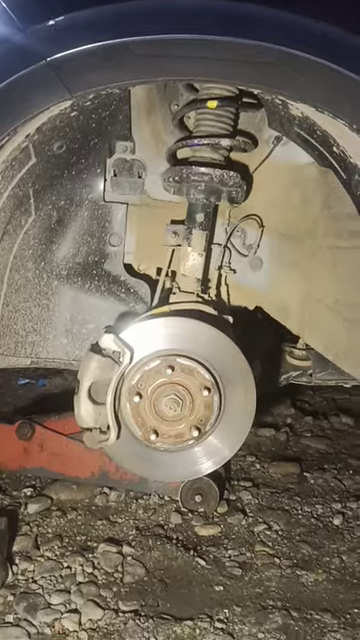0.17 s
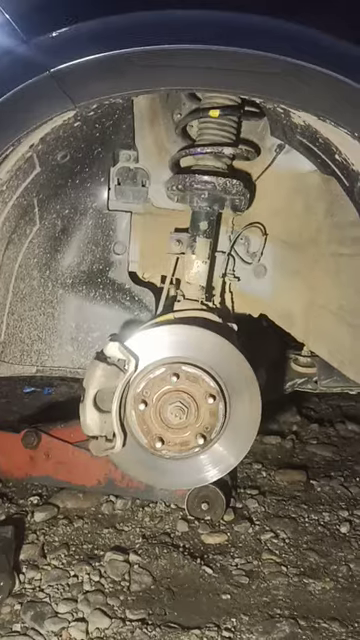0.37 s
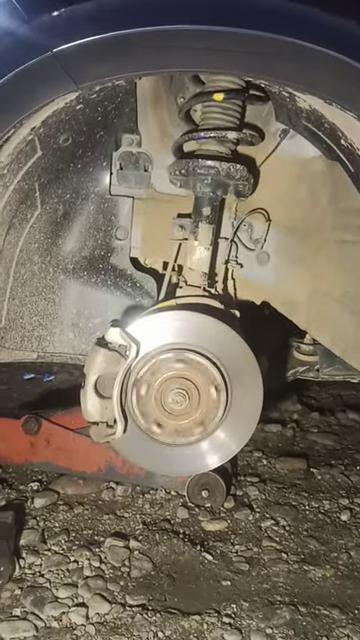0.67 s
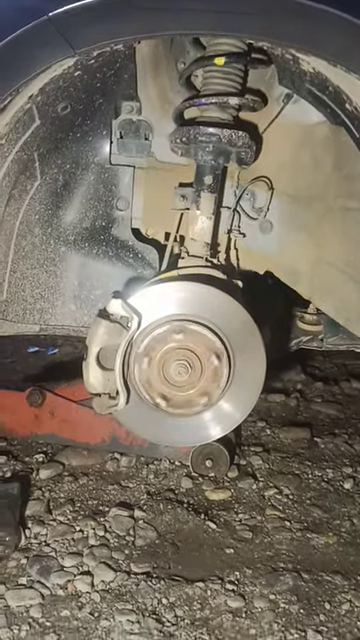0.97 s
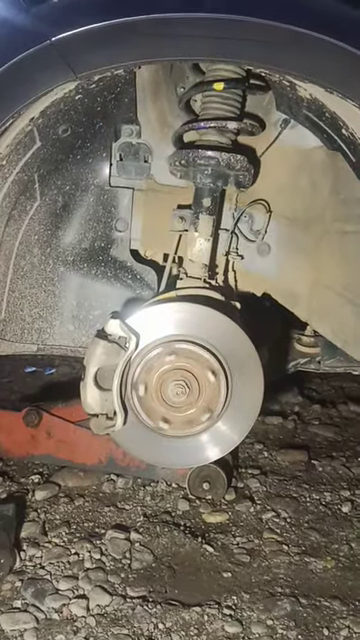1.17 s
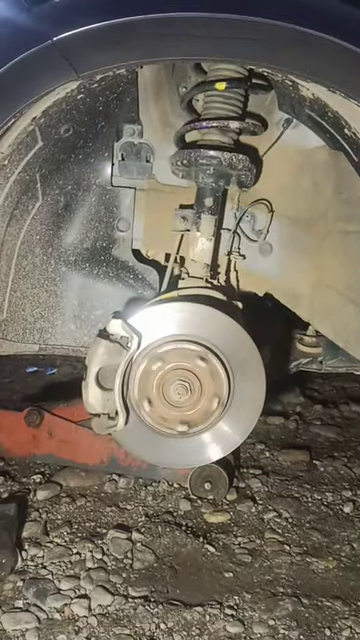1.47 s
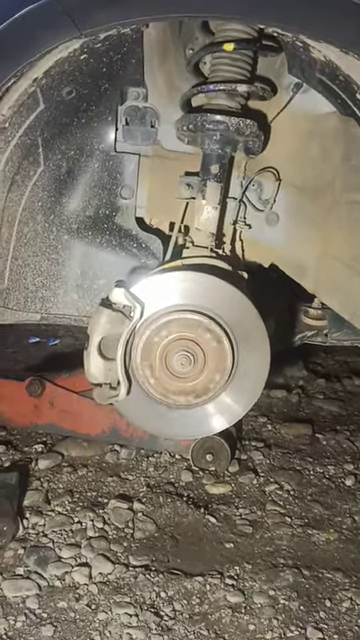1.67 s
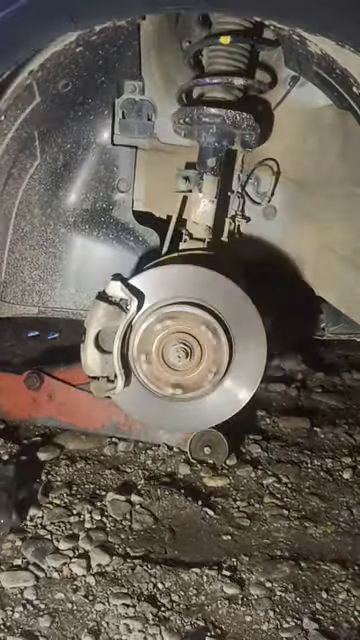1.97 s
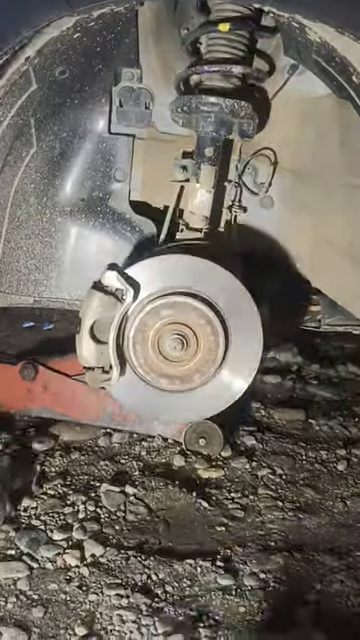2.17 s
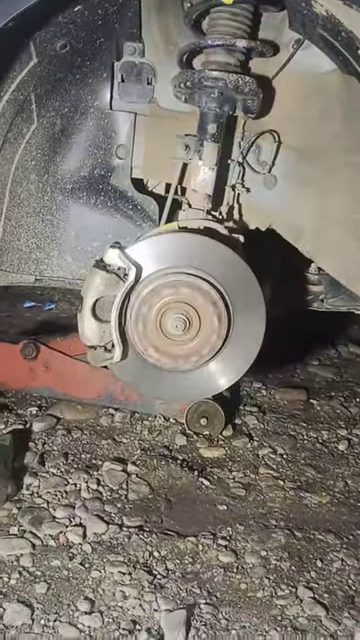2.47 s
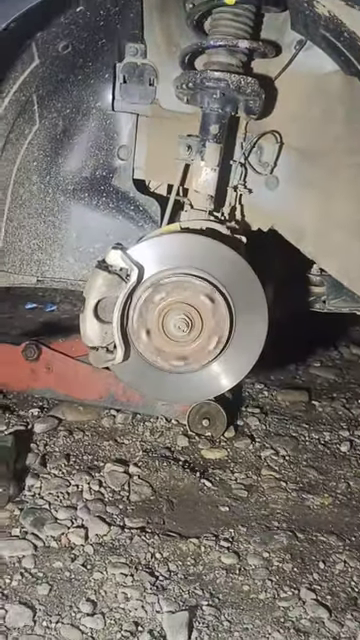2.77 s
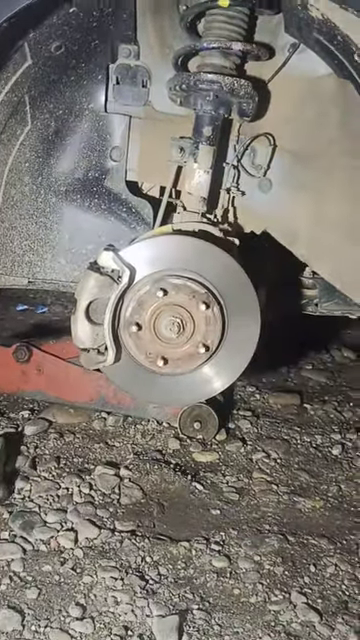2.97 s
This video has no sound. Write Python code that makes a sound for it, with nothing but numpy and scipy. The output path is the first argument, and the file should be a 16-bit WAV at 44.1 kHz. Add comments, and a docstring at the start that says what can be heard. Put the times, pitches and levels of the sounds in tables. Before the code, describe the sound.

One brief brake squeak from a turning disc, with two metal knocks over engine and wind rumble.

```python
"""A bare brake disc turns on a jacked-up car at night, one microphone close to the wheel arch.
The pad drags on the disc and sets its modes ringing in one short squeal. Loose metal knocks twice,
chattering and ringing until it seats, and a few dull thumps and gritty scuffs come between.
Behind it all lie a rough, fluttering rush and the low rumble of engine and wind."""
import sys
import numpy as np
from scipy import signal
from scipy.fft import rfft, irfft, next_fast_len
from scipy.io import wavfile

SR = 44100
rng = np.random.default_rng(int(sys.argv[2]) if len(sys.argv) > 2 else 0)


def wav_out(sig):
    """Save sig, one row per channel (or a flat mono array), as 16-bit PCM at SR to the path in sys.argv[1]."""
    wavfile.write(sys.argv[1], SR, np.round(np.clip(np.atleast_2d(sig).T, -1, 1) * 32767).astype(np.int16))


N = 137151

# Disc modes taking turns to sound, close up: start_s, length_s, pitch_hz, level_db, fuzz_ratio
BRAKE_SQUEAKS = [(.097, .028, 5110, -44, .6), (1.4, .024, 2116, -43, .3), (1.426, .056, 2118, -37.5, .25),
                 (1.435, .05, 842, -35, .45), (1.385, .06, 3063, -56, .3), (1.434, .025, 3063, -46, .1),
                 (1.453, .028, 3066, -30, .05), (1.486, .042, 3074, -33, .05), (1.4, .14, 4624, -57, .5),
                 (1.438, .028, 4624, -43, .2), (1.467, .029, 4626, -36, .2), (1.489, .026, 4620, -45, .35),
                 (1.385, .16, 5566, -63, .5), (1.447, .024, 5566, -52, .2), (1.473, .037, 5566, -43.5, .35),
                 (1.484, .024, 2760, -45, .8), (1.432, .07, 8091, -66, .2), (1.483, .023, 8662, -59, .3),
                 (1.458, .035, 11330, -67, .2), (1.433, .048, 12608, -67, .6),
                 (1.433, .035, 13300, -67, .6), (1.433, .03, 14150, -69, .8), (1.506, .02, 12680, -57, .5),
                 (1.504, .022, 11050, -61, .5), (1.505, .022, 9400, -61, .6), (1.56, .17, 14570, -77, .7),
                 (1.57, .14, 11470, -81, .6), (2.838, .06, 3380, -57, .95)]


def brake_squeal(length_s, pitch_hz, level_db, fuzz):
    """One disc mode swells, wavers, lets go and rings out; uneven friction blurs its pitch."""
    edge_s, ring_s = .013, .006
    waver_hz, blur_hz, boost_db = 20, 130, 1
    t = np.arange(0, length_s + 6 * ring_s, 1 / SR)
    rise = np.sin(np.pi / 2 * np.minimum(t / edge_s, 1)) ** 2
    fall = 1 / np.cosh(np.maximum(t - length_s + edge_s, 0) / ring_s)
    pitch = pitch_hz + waver_hz * drift(rate_hz=320, size=len(t))
    blur = (drift(blur_hz, len(t)) + 1j * drift(blur_hz, len(t))) / np.sqrt(2)
    pure = np.exp(2j * np.pi * np.cumsum(pitch) / SR)
    tone = (np.sqrt(1 - fuzz ** 2) + fuzz * blur) * pure
    return amp(level_db + boost_db) * np.sqrt(2) * rise * fall * tone.real


# The pad rubbing before, under and after the squeal: time_s, level_db
DRAG_LEVEL = [(1.12, -70), (1.18, -43), (1.35, -45), (1.47, -39), (1.57, -45), (1.9, -48), (2.05, -56),
              (2.2, -90)]


def pad_drag(pitch_hz=1287, width_hz=284):
    """Pad friction excites one broad resonance of the brake."""
    resonance = np.exp(2j * np.pi * pitch_hz * np.arange(N) / SR)
    friction = drift(width_hz / 2) + 1j * drift(width_hz / 2)
    return unit((resonance * friction).real) * level(DRAG_LEVEL)


# Ring of the lower-pitched loose part: pitch_hz, level_db, t60_s
CLANK_MODES = [(495, 2.5, .06), (940, 2, .06), (2060, -2, .07), (2240, -8, .07), (2560, -10, .07),
               (3450, -10, .07), (4380, -21, .07), (5260, -14, .07), (7090, -31, .15), (8550, -24, .12),
               (9720, -15, .08), (10900, -17, .13), (13780, -20, .09), (14640, -21, .12)]
# Crunch of its contact: frequency_hz, density_db
CLANK_CRUNCH = [(200, -10), (500, -4), (1300, 0.5), (2400, -5), (4000, -13.5), (5500, -18.5), (6300, -35),
                (7800, -39), (9200, -21), (12200, -30), (14000, -29), (15500, -36)]


def clank():
    """A loose part knocks with a short, low ring."""
    return metal_knock(CLANK_MODES, CLANK_CRUNCH, chatter_s=.033, seated_s=.052,
                       ring_db=-34, crunch_db=-30, tail_db=-9.5, tail_t60_s=.12)


# Ring of the brighter loose part: pitch_hz, level_db, t60_s
CLINK_MODES = [(2230, -1, .06), (3490, 1, .06), (4605, 2, .18), (5420, -8, .08), (6968, -12, .12),
               (9282, -11, .2), (9950, -7, .05), (10340, -8, .07), (11570, -5, .06), (12400, -8, .05),
               (12585, -4, .08), (12890, -11, .2), (13770, -9, .07), (14955, -11, .09)]
# Crunch of its contact: frequency_hz, density_db
CLINK_CRUNCH = [(500, -12), (2000, 2), (3500, -4), (5400, -9), (6500, -21), (10000, -12), (13000, -8),
                (15500, -12)]


def clink():
    """A second loose part knocks with a thin, high ring."""
    return metal_knock(CLINK_MODES, CLINK_CRUNCH, chatter_s=.024, seated_s=.039,
                       ring_db=-38.5, crunch_db=-36, tail_db=-6, tail_t60_s=.13)


def metal_knock(modes, crunch, chatter_s, seated_s, ring_db, crunch_db, tail_db, tail_t60_s):
    """Metal chatters on metal, rings with clear modes over a dense tail, and is damped as it seats."""
    chatter_hz, damping_s = 250, .005
    t = np.arange(SR // 8) / SR
    contact = np.sin(np.pi * np.minimum(t / chatter_s, 1))
    force = contact * amp(2 * drift(chatter_hz, len(t)))
    damping = np.exp(-np.maximum(t - seated_s, 0) / damping_s)

    def ring(t60_s):
        """Builds up under the chatter and dies away."""
        build = signal.fftconvolve(force ** 2, amp(-60 * t / t60_s))[:len(t)]
        return damping * build / build.max()

    tail = amp(crunch_db + tail_db) * ring(tail_t60_s)
    sound = (amp(crunch_db) * force + tail) * noise(crunch, len(t))
    for pitch_hz, level_db, t60_s in modes:
        phase = 2 * np.pi * (pitch_hz * t + rng.random())
        jitter = .6 * force * drift(rate_hz=150, size=len(t))
        sound += amp(ring_db + level_db) * ring(t60_s) * np.sin(phase + jitter)
    return sound


# Dull thumps at the car: start_s, length_s, pitch_hz, level_db
THUMPS = [(.508, .013, 110, -19), (1.112, .024, 115, -24), (2.045, .02, 100, -21), (2.072, .028, 85, -23),
          (2.772, .034, 180, -20), (2.913, .02, 110, -23)]


def thump(length_s, pitch_hz, level_db):
    """A few cycles of a dull low push, unsteady in pitch."""
    push = swell(length_s)
    pitch = pitch_hz * (1 + .19 * drift(rate_hz=140, size=len(push)))
    return amp(level_db) * np.sqrt(2) * push * np.sin(2 * np.pi * np.cumsum(pitch) / SR)


# Scuffs of grit near the microphone: start_s, length_s, level_db, hiss_db
SCUFFS = [(.075, .028, -32.5, -64), (.113, .044, -29.5, -57), (.136, .05, -37, -53.5),
          (.798, .022, -46, -64), (.83, .016, -50, -66), (1.43, .045, -48, -62), (1.49, .04, -44, -64),
          (1.94, .075, -58, -60), (2.926, .038, -35.5, -67), (2.978, .018, -48, -78)]
# The body of a scuff and its fine hiss: frequency_hz, density_db
SCUFF_SPECTRUM = [(200, -7), (550, 4.5), (1200, 1), (2200, -1), (3200, -10), (4800, -9), (5700, -22),
                  (6800, -33), (15000, -53)]
HISS_SPECTRUM = [(4000, -23), (7000, -1), (9000, 5), (11500, -1), (13800, 7), (15500, -21.5)]


def scuff(length_s, level_db, hiss_db):
    """A short gritty rub with fine hiss on top."""
    stroke = swell(length_s)
    body = amp(level_db) * noise(SCUFF_SPECTRUM, len(stroke))
    hiss = amp(hiss_db) * noise(HISS_SPECTRUM, len(stroke))
    return stroke * (body + hiss)


# The rush around the wheel arch and its treble: frequency_hz, density_db
RUSH_SPECTRUM = [(100, -7.5), (250, -3), (400, 1), (600, -3.5), (900, -5.5), (1350, -7.5), (1700, -15),
                 (2400, -19), (3300, -37), (6000, -75)]
TREBLE_SPECTRUM = [(700, -36), (1500, 5), (2200, -1), (2800, 0), (3300, -6), (4200, -4), (5300, -12.5),
                   (5800, -17.5), (6500, -27.5), (7600, -30), (9200, -23.5), (11500, -28), (14000, -24),
                   (15500, -26.5)]
# Their rise and fall: time_s, body_db, treble_db
RUSH_LEVEL = [(.08, -31, -43), (.14, -39.5, -47), (.2, -34.5, -45), (.45, -37, -49.5), (.7, -39, -53),
              (.82, -35, -52), (.98, -40.5, -52), (1.25, -40, -53.5), (1.48, -34.5, -44.5),
              (1.6, -34.5, -50), (1.69, -33.5, -45.5), (1.86, -36, -51.5), (1.99, -36, -47.5),
              (2.06, -30.5, -38.5), (2.15, -34.5, -44.5), (2.27, -32, -43), (2.39, -34, -47.5),
              (2.5, -31.5, -42), (2.7, -38, -50.5), (2.8, -35.5, -51), (2.9, -40.5, -52.5),
              (3.1, -41.5, -53)]


def rush(flutter_db=1.36, ticks_per_s=260, grit_db=-10):
    """A fluttering rush of noise; tiny ticks make its treble gritty."""
    flutter = amp(flutter_db * drift(rate_hz=57))
    ticks = (rng.random(N) < ticks_per_s / SR) * rng.choice([-1, 1], N)
    tick_gain = amp(-2.5 * np.minimum(rng.exponential(1, N), 4))
    treble = noise(TREBLE_SPECTRUM) + amp(grit_db) * colour(ticks * tick_gain, TREBLE_SPECTRUM)
    body = noise(RUSH_SPECTRUM) * level(RUSH_LEVEL)
    return flutter * (body + treble * level(RUSH_LEVEL, column=2))


# Engine and wind in the background: frequency_hz, density_db
RUMBLE_SPECTRUM = [(15, -13), (30, -18.5), (45, -9), (65, -3), (120, 0), (170, -0.5), (250, -9),
                   (330, -16.5), (600, -31), (1500, -76)]
# Their rise and fall at the microphone: time_s, level_db
RUMBLE_LEVEL = [(.09, -28), (.2, -26.5), (.5, -27), (.8, -30.5), (1.05, -32), (1.15, -31), (1.4, -29.5),
                (1.62, -33.5), (1.74, -26), (1.95, -29), (2.06, -23.5), (2.16, -30), (2.25, -26.5),
                (2.52, -28.5), (2.72, -32), (3.1, -31)]


def rumble(lumpiness_db=1):
    """Lumpy low noise of engine and wind."""
    lumpy = noise(RUMBLE_SPECTRUM) * amp(lumpiness_db * drift(rate_hz=62))
    return unit(lumpy) * level(RUMBLE_LEVEL)


def amp(db):
    """Decibels to gain."""
    return 10 ** (np.asarray(db) / 20)


def unit(x):
    """Scales to rms 1."""
    return x / np.sqrt(np.mean(x ** 2) + 1e-20)


def add(mix, start_s, sound):
    """Mixes a sound in at its start time."""
    part = mix[max(round(start_s * SR), 0):][:len(sound)]
    part += sound[:len(part)]


def level(rows, column=1):
    """Gain over time from one dB column of a curve."""
    rows = np.array(rows)
    return amp(np.interp(np.arange(N) / SR, rows[:, 0], rows[:, column]))


def colour(x, spectrum):
    """Gives x a spectrum, at rms 1."""
    hz, db = np.transpose(spectrum)
    f = np.fft.rfftfreq(len(x), 1 / SR)
    gain = amp(np.interp(np.log(f + 1), np.log(hz), db))
    return unit(irfft(rfft(x) * gain, len(x)))


def noise(spectrum, size=N):
    """Coloured noise, rms about 1."""
    white = rng.standard_normal(next_fast_len(max(size, SR // 2)))
    return colour(white, spectrum)[:size]


def drift(rate_hz, size=N):
    """Smooth random motion up to a rate, rms about 1."""
    n = next_fast_len(max(size, SR // 2))
    lowpass = np.exp(-(np.fft.rfftfreq(n, 1 / SR) / rate_hz) ** 2)
    return unit(irfft(rfft(rng.standard_normal(n)) * lowpass, n))[:size]


def swell(length_s):
    """A half-sine rise and fall."""
    return np.sin(np.pi * np.linspace(0, 1, max(int(length_s * SR), 2)))


def scene():
    """All sources in mono, close to the wheel arch."""
    mix = rumble() + rush() + pad_drag()
    for source, events in ((brake_squeal, BRAKE_SQUEAKS), (thump, THUMPS), (scuff, SCUFFS)):
        for start_s, *settings in events:
            add(mix, start_s, source(*settings))
    add(mix, start_s=1.126, sound=clank())
    add(mix, start_s=2.197, sound=clink())
    return mix[None]


def record(dry):
    """The microphone signal fades in quickly and loses its highest treble."""
    fade_in_s, cutoff_hz = (.057, .093), 15600
    opening = np.interp(np.arange(N) / SR, fade_in_s, (0, 1)) ** 2
    lowpass = signal.firwin(511, cutoff_hz, window=("kaiser", 9), fs=SR)
    return signal.oaconvolve(dry * opening, lowpass[None], "same")


dry = scene()
out = record(dry)
wav_out(out)
```